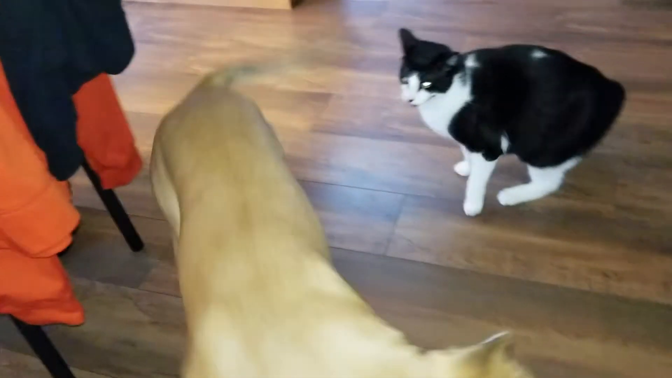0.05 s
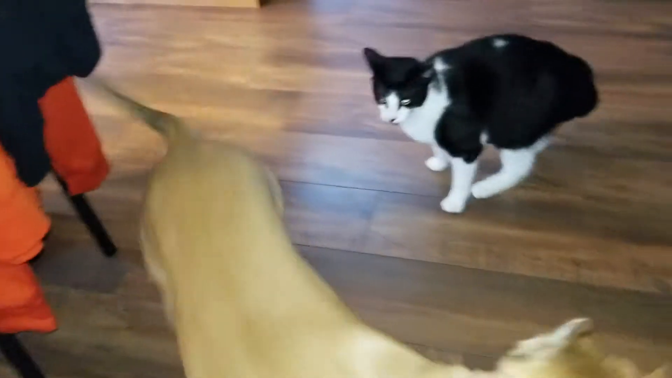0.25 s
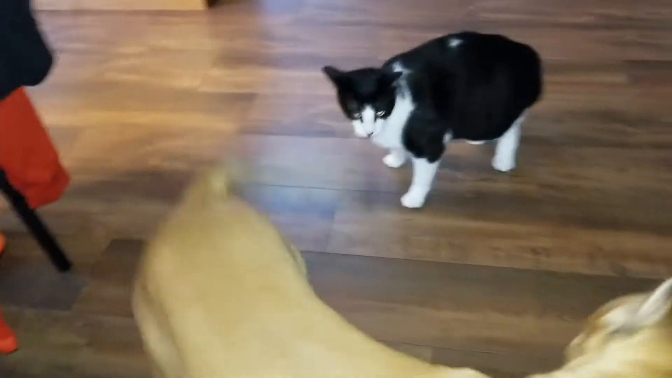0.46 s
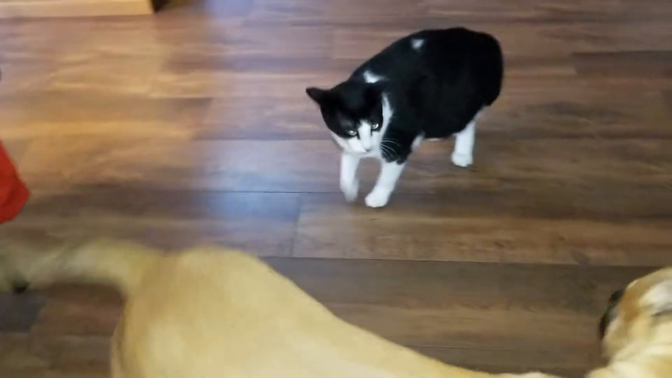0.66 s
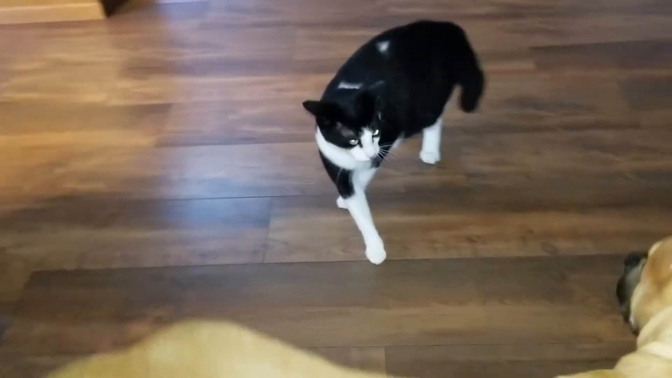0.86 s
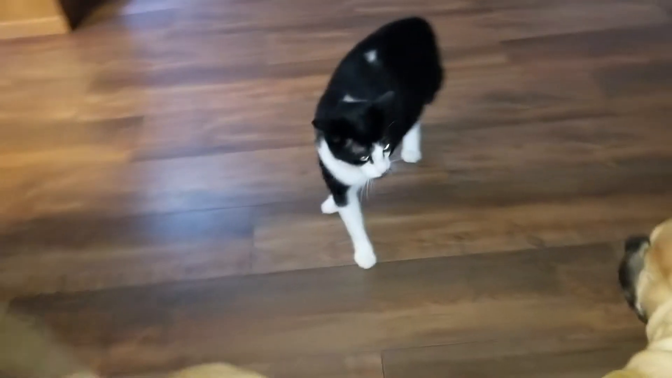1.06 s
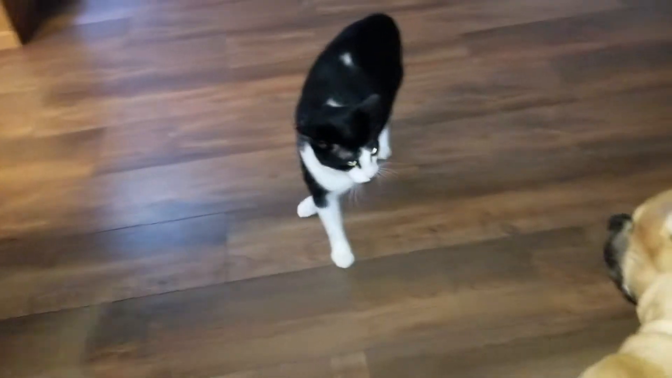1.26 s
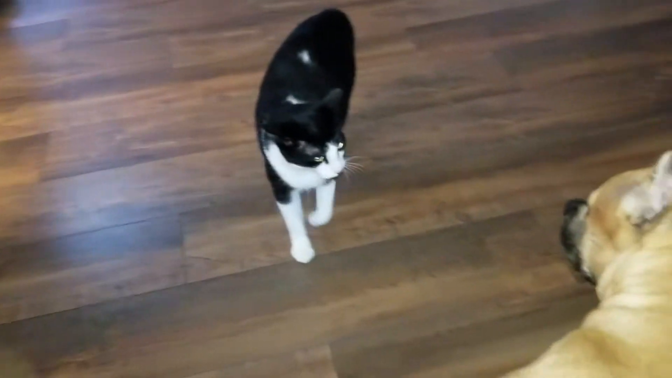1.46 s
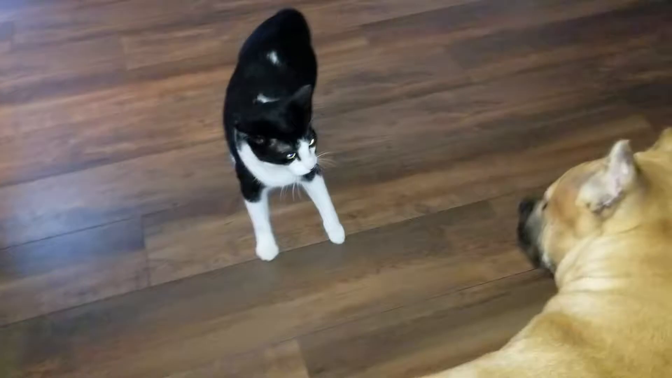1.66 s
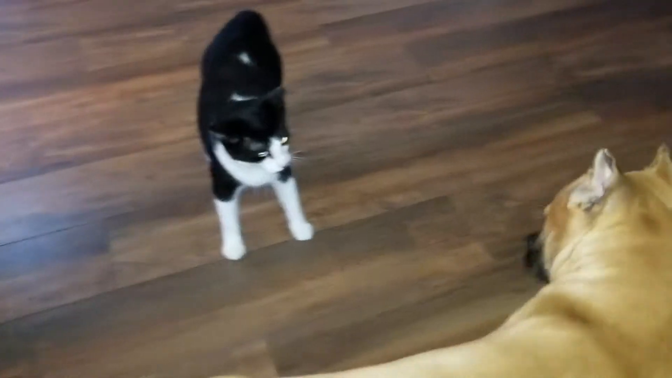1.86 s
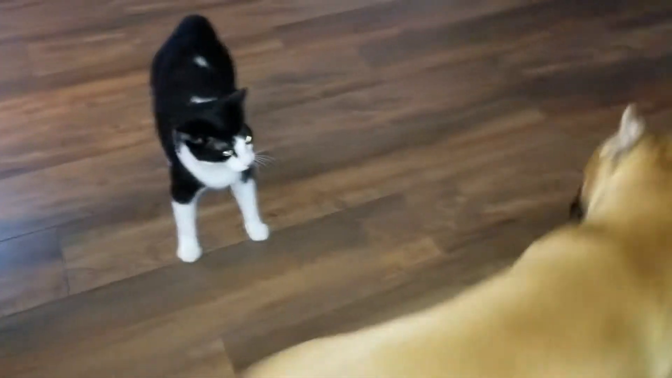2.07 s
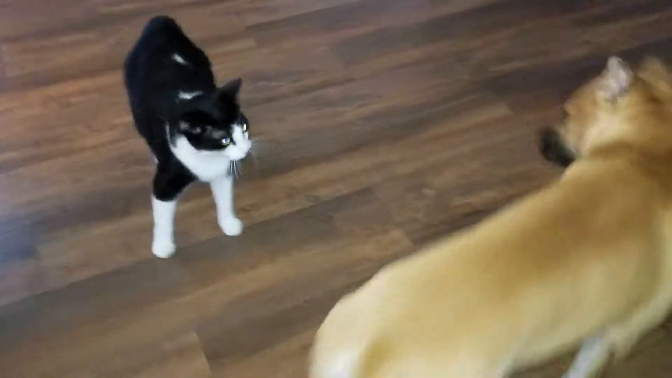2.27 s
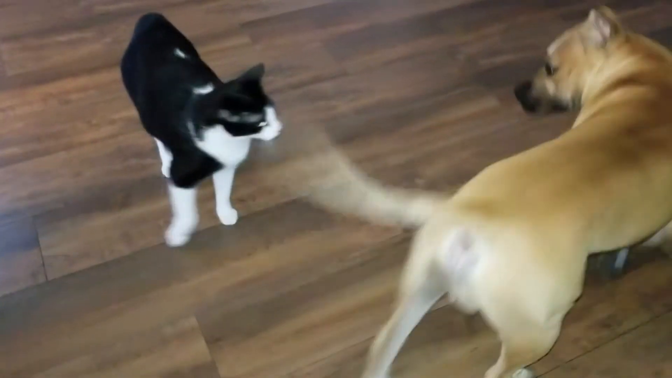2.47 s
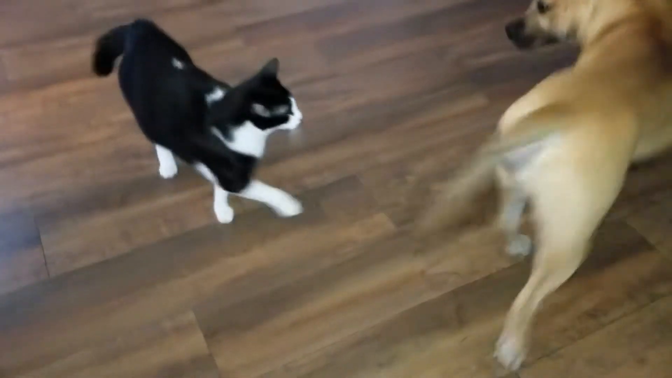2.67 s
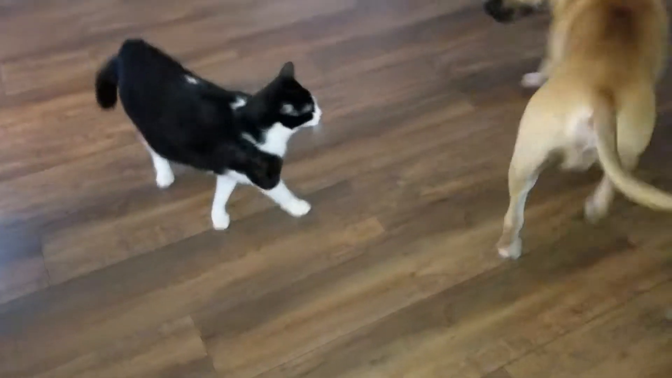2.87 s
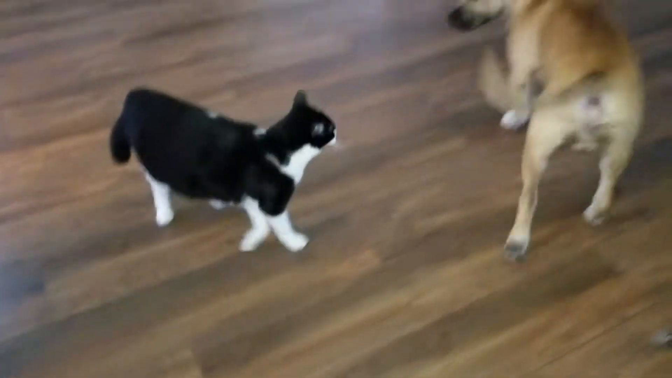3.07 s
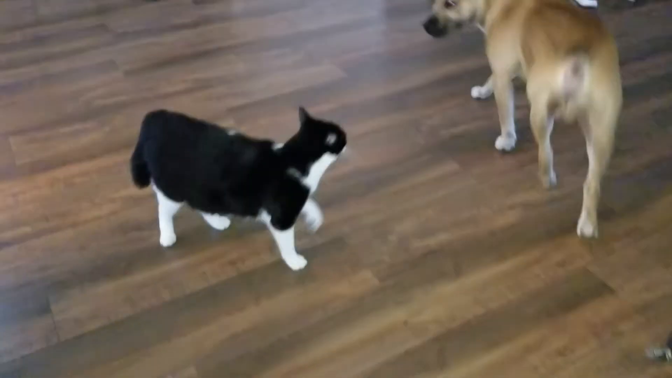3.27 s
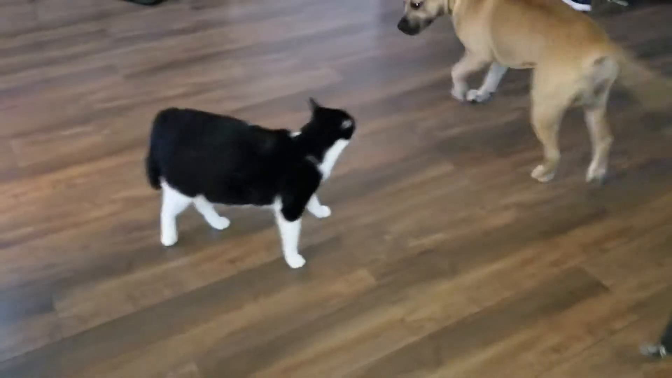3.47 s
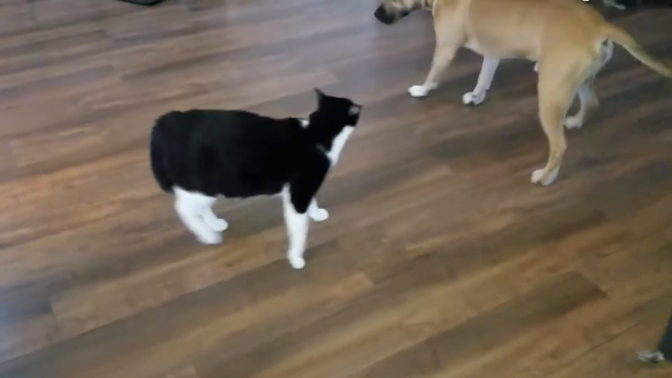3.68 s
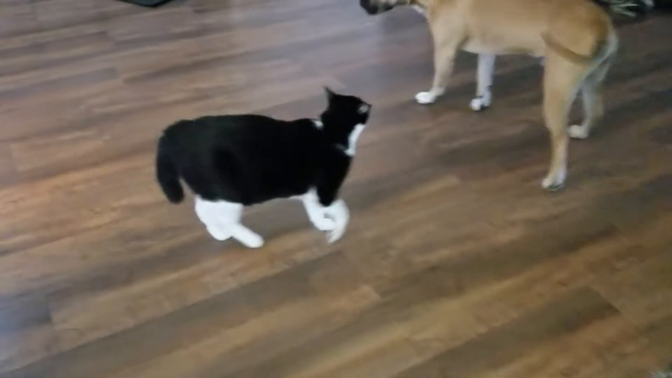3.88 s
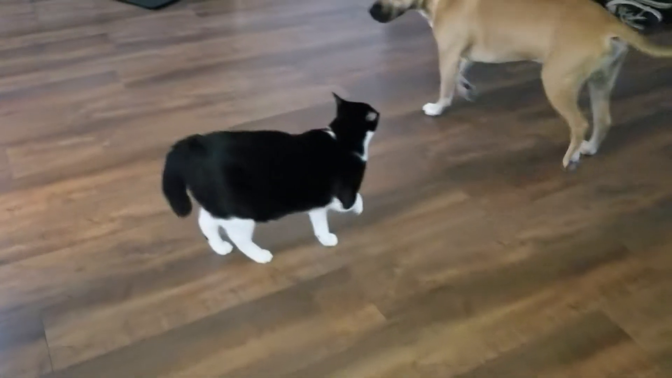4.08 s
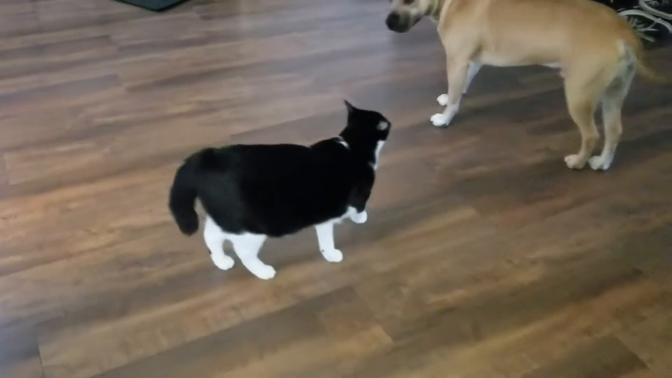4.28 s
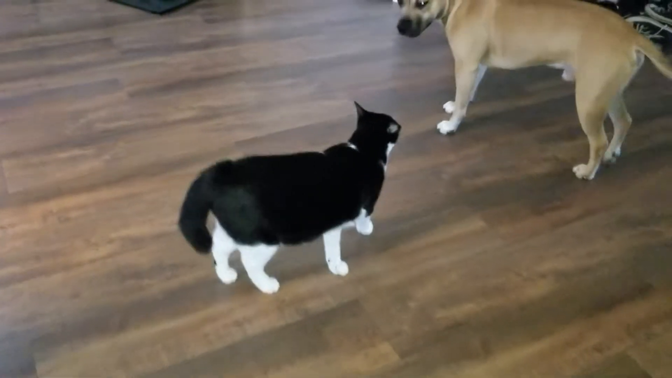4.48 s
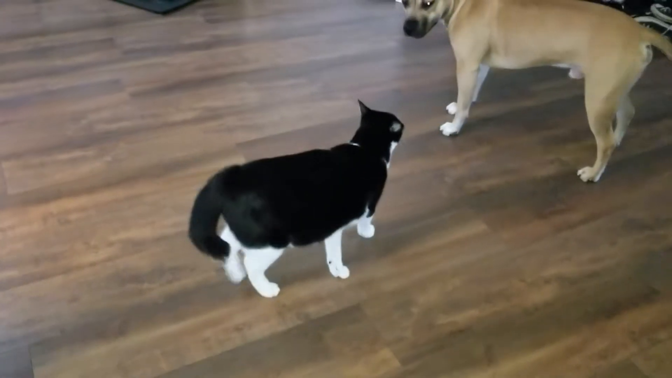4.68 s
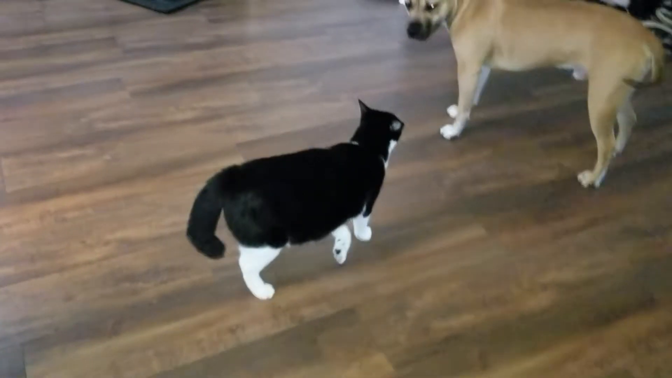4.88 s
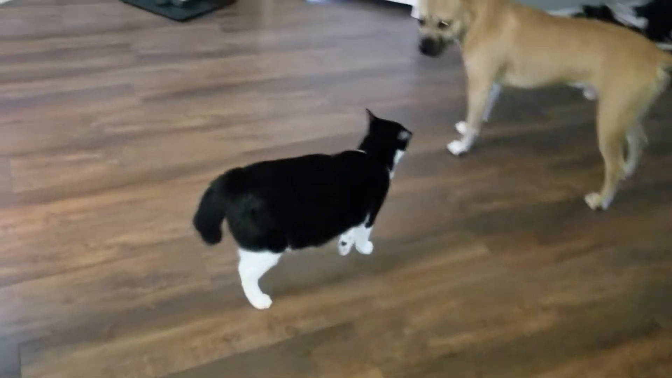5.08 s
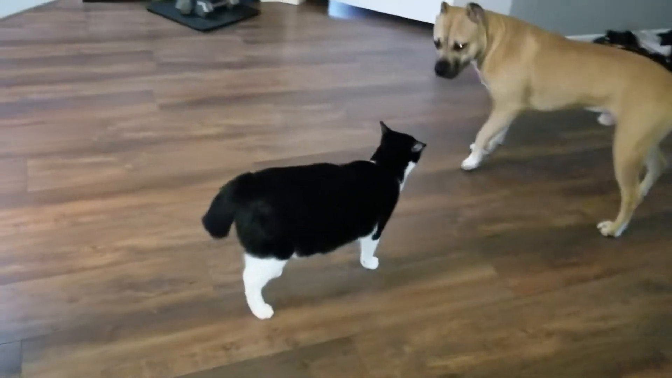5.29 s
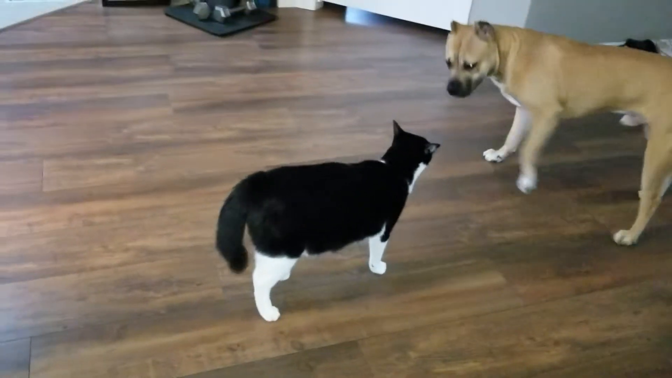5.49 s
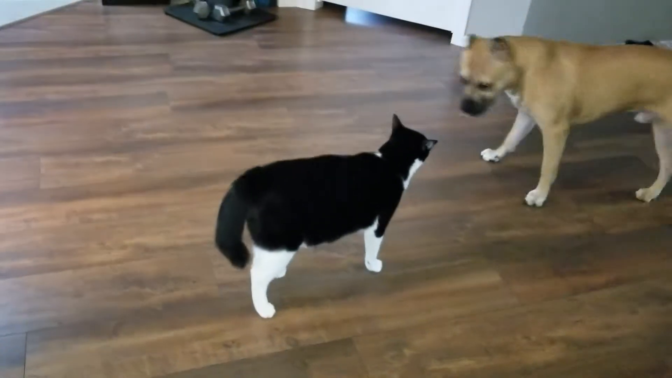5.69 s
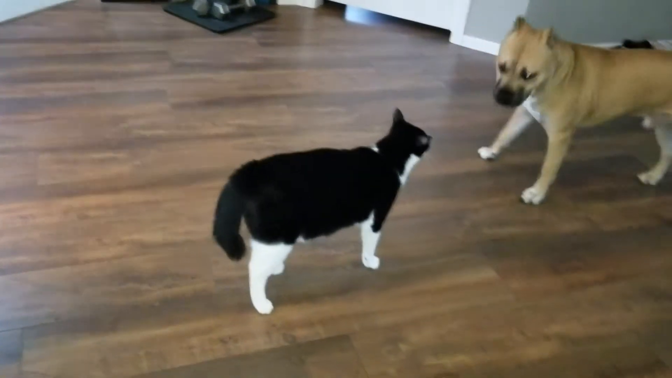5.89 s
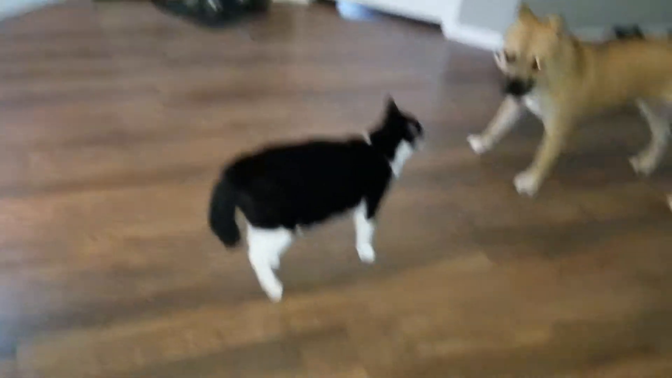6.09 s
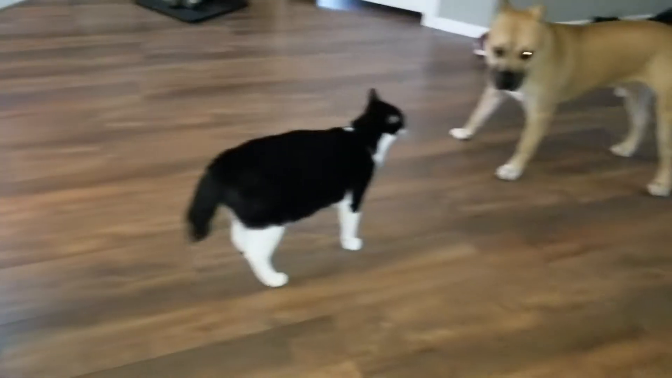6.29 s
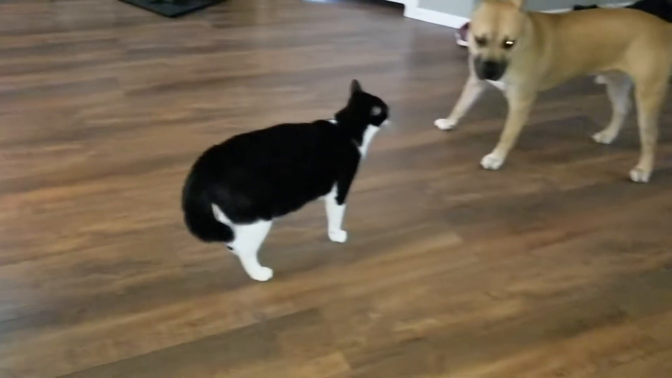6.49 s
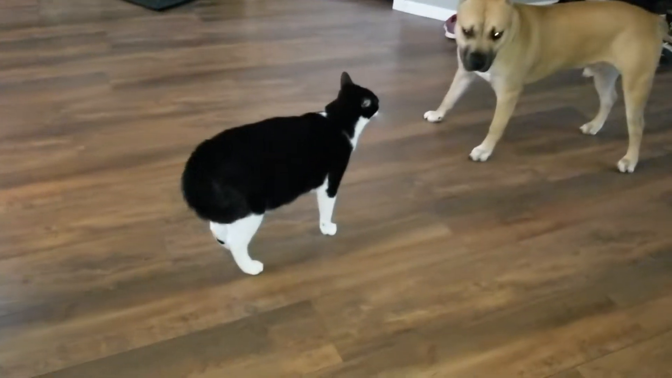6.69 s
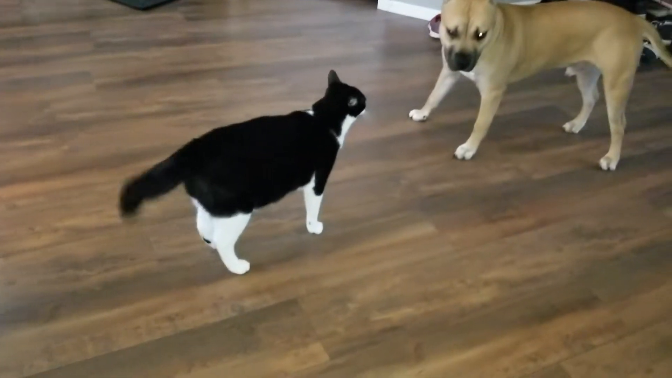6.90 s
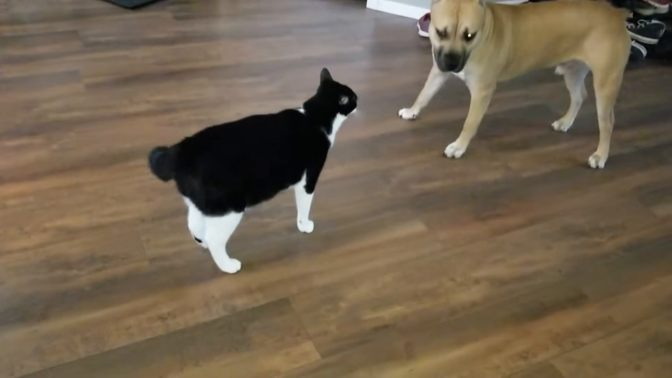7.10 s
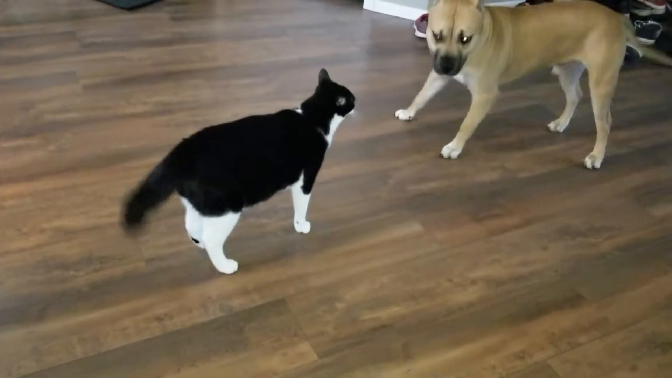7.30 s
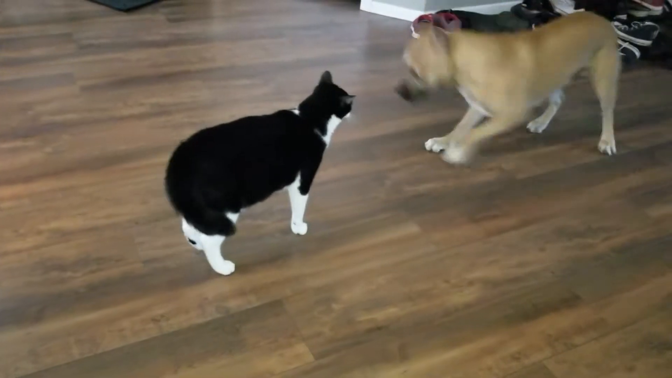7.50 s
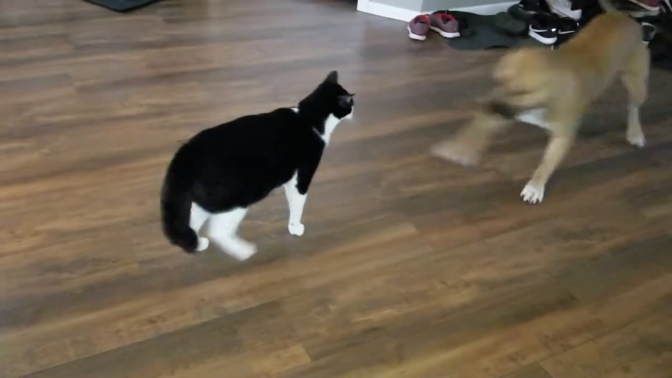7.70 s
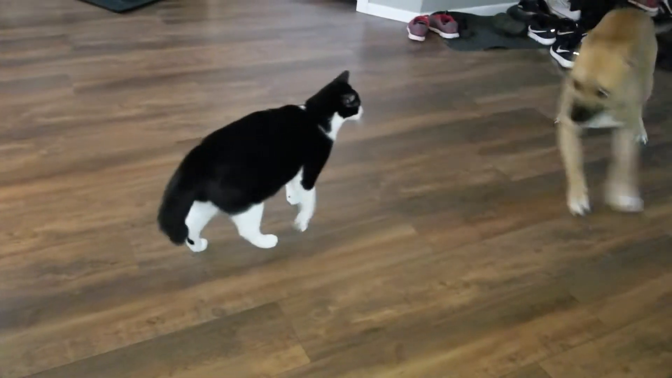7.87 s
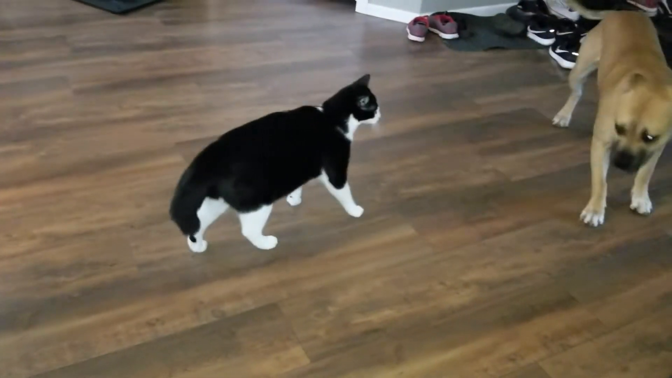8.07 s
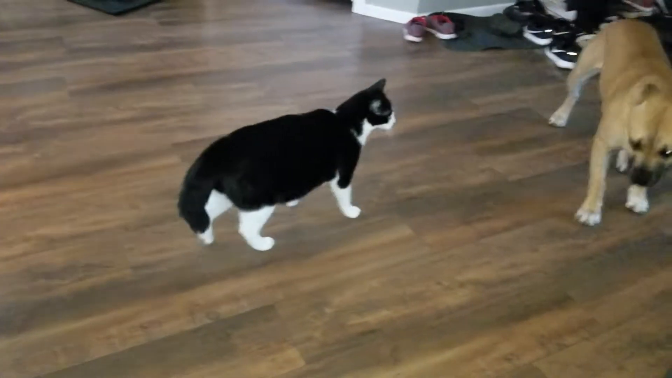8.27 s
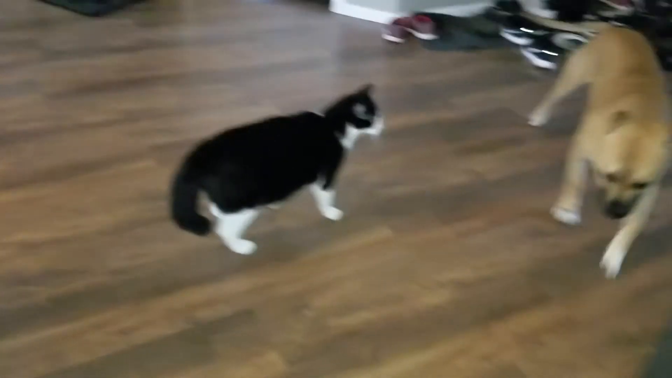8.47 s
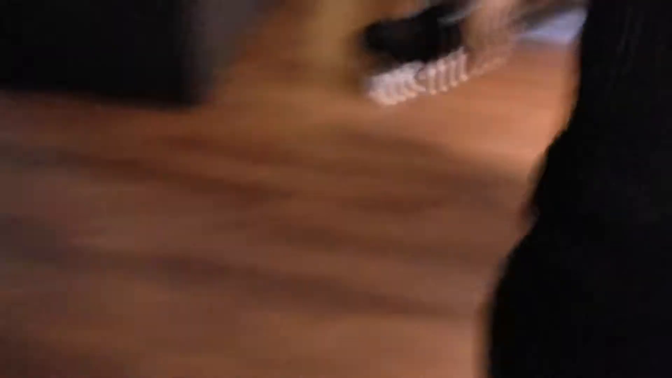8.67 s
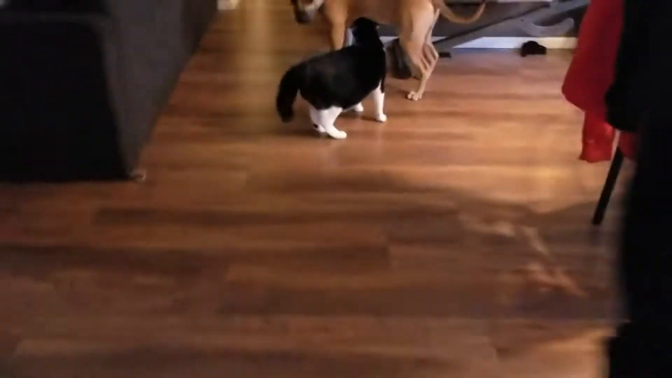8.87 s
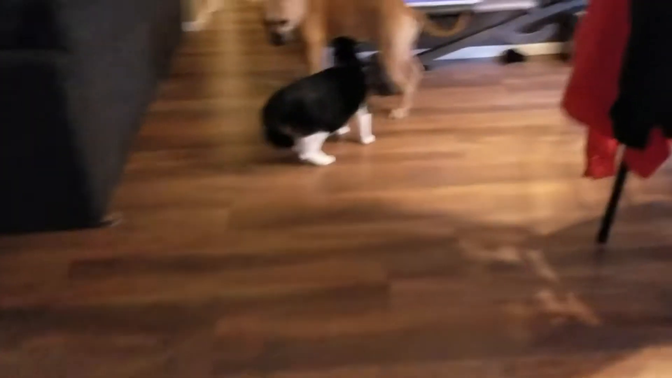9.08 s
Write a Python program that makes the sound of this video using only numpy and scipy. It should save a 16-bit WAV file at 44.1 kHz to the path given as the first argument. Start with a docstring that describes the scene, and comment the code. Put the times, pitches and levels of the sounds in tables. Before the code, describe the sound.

A dog steps around a cat on a laminate floor, its claws ticking in small irregular clusters with soft paw thumps and faint slides. A sharper group of clicks comes past the middle, then a short lull. A sudden lunge brings the loudest scrabbling and thudding before lighter ticks resume. The bare living room rings briefly after each click, a faint appliance hums, and the sound leans slightly left.

```python
"""A dog's claws tick and skid on hard laminate as it circles a cat in a bare living room.
Each contact rings nail and plank; a sudden lunge scrabbles loudly. Paws thump the boards, pads and
fur slide, a loose plank rings, hiss puffs softly. The room rings after every tick; an appliance hums.
Two spaced microphone ports hear it: the left louder, and a little later on the ticks."""
import sys
import numpy as np
from scipy import signal
from scipy.fft import rfft, irfft, next_fast_len
from scipy.io import wavfile
from scipy.ndimage import map_coordinates

SR = 44100
rng = np.random.default_rng(int(sys.argv[2]) if len(sys.argv) > 2 else 0)


def dump_mix(stems):
    """Bounce the given channels to the path in sys.argv[1] as a 16-bit WAV at rate SR."""
    frames = np.atleast_2d(stems).T  # one column per channel
    limited = np.clip(frames, -1, 1)  # hard clip at full scale
    pcm = np.round(limited * 32767).astype(np.int16)
    wavfile.write(sys.argv[1], SR, pcm)


N = 403074

# claw contacts (time [s], peak [dB], centre [Hz], treble [dB], length [ms])
CLAW_CONTACTS = [(0.067, -39, 5170, -15, 5.8), (0.087, -35.5, 2770, -22, 1.3),
                 (.257, -44.5, 4360, -37, 2.2), (0.35, -27, 4900, -4, 1.8), (0.408, -34, 2550, -8.5, 5.6),
                 (.562, -31.5, 3830, -18.5, 17), (0.5812, -37.5, 2850, -30, 4),
                 (1.762, -50, 4730, -27, 3.5), (1.788, -45, 3760, -38, 3.6), (1.861, -48, 4530, -28, 6.4),
                 (2.0171, -38.5, 7200, -15, 2.4), (2.0685, -33, 3200, -10, 5.2),
                 (2.121, -26, 3130, -17, 0.26), (2.156, -35, 4000, -25, 0.58), (2.199, -45, 6000, -7, .5),
                 (2.3748, -33, 6460, -12, 1.5), (2.3949, -30, 3200, -9.5, 2), (2.3997, -39, 4540, -18, 1.8),
                 (2.414, -30.5, 3430, -16, 1.5), (2.6537, -37, 2690, -20, 1.4),
                 (2.682, -31.5, 3330, -33.5, 12), (2.69, -20.5, 4940, -14, 0.22),
                 (2.711, -33.5, 4080, -14, 3.2), (2.845, -41, 5130, -1, 0.72), (2.983, -38, 4570, -13, 1.2),
                 (3.0212, -27.5, 4460, -18, 2.7), (3.0359, -22, 4600, -12.5, 0.65),
                 (3.281, -46, 4400, -15, 7.5), (3.314, -36.5, 4560, -14, 1.5),
                 (3.355, -28, 4680, -15.5, 1.05), (3.3655, -39, 4930, -3, 0.74),
                 (3.386, -30.5, 4640, -23, 1.1), (3.691, -33.5, 4460, -12.5, 3.2),
                 (3.898, -48, 4000, -21, .8), (3.9094, -43.5, 4220, -17, 1.2), (3.949, -33.5, 3900, -31, 9),
                 (4.023, -34, 4300, -36, 5.2), (4.22, -20, 4400, -15, 0.54), (4.2379, -31.5, 6760, -6, 2.5),
                 (4.4633, -35, 4180, -27, 13), (4.478, -35.5, 3560, -17, 4.6),
                 (4.718, -45.5, 3850, -40, 1.1), (4.857, -44.5, 6000, -13, 9.5),
                 (4.879, -38, 6100, -8, 8.8), (5.284, -48.5, 3500, -47.5, 13), (5.303, -41, 4350, -43, 4.7),
                 (5.4452, -45.5, 3860, -34, 13), (5.571, -17, 4660, -37, 0.7),
                 (5.5733, -15.5, 5430, -16.5, 0.61), (5.579, -15.5, 4580, -15.5, 1.6),
                 (5.685, -25.5, 3690, -11.5, 3.5), (5.8702, -37.5, 3900, -18.5, 2.1),
                 (5.8847, -28.5, 4530, -9, 1.26), (7.299, -48, 4200, -34.5, 2.4),
                 (7.313, -40.5, 4050, -51.5, 2.8), (7.321, -33, 4000, -14.5, 3.5),
                 (7.337, -31, 3860, -10, 4.3), (7.3546, -22.5, 4150, -18, 12),
                 (7.4243, -4.5, 5370, -11, 0.41), (7.43, -12.5, 4140, -22, 0.63),
                 (7.451, -10, 4130, -9, 1.4), (7.5957, -10, 4420, -12, 0.62),
                 (7.598, -5.5, 4440, -14.5, 1.25), (7.619, -15.5, 5340, -15, 1.1),
                 (7.8688, -13.5, 4380, -14, 2.8), (8.339, -41, 4300, -6.5, 2.4),
                 (8.3547, -29, 4450, -29, 1.4), (8.371, -34, 4180, -18.5, 1.1),
                 (8.408, -41, 4300, -17.5, 1.7), (8.441, -34.5, 4200, -19, 1.4),
                 (8.584, -30.5, 4970, -8.5, 1.54), (8.6126, -27, 5600, -44, 0.37),
                 (8.6431, -27.5, 4570, -13.5, 1.5), (8.657, -35, 4480, -40, 1.6),
                 (8.675, -32.5, 4200, -41, 2.1), (8.831, -42, 4100, -26, 3),
                 (8.9567, -36.5, 4600, -20, 0.4), (9.0513, -36.5, 4140, -21, 2.4),
                 (9.0729, -21, 4340, -18.5, 0.56), (9.0934, -41, 5700, -33, 0.88)]
# nail on laminate (frequency [Hz], density [dB])
NAIL_SPECTRUM = [(700, -42.5), (1500, -16), (2300, -2), (3300, -2), (5000, -6), (8000, -2.5), (9000, -24),
                 (11000, -57)]
# tick's treble (frequency [Hz], density [dB])
EDGE_SPECTRUM = [(6000, -58.5), (8500, -2), (10000, -1.5), (12500, 1), (16000, -15), (17000, -71)]
# plank under the claw (frequency [Hz], density [dB])
PLANK_SPECTRUM = [(500, -17), (830, -14.5), (1400, -13.5), (2200, -22.5)]
# weight behind the claws (time [s], plank knock over tick [dB])
CLAW_WEIGHT = [(.3, -8), (.6, -49), (1.8, -6), (2.1, -11), (2.4, -14), (2.67, -8), (3.05, -21), (3.33, -20),
               (3.9, -21.5), (4.9, -14), (5.58, -13), (5.7, -14), (7.4, -12), (7.6, -13), (8.4, -21.5),
               (8.65, -20.5), (9.1, -59)]
# paw landings (time [s], level [dB], boom [Hz])
PAW_LANDINGS = [(0.069, -45.5, 66.6), (0.3137, -39, 170), (.345, -40, 130), (0.762, -44.5, 176),
                (1.958, -42.5, 88), (2.28, -49, 80.5), (2.657, -35, 100), (2.686, -36, 237),
                (3.289, -43, 144), (3.317, -39, 74.5), (4.229, -49, 63.5), (5.742, -36, 144),
                (5.765, -43.5, 75), (6.658, -44, 140), (6.675, -54, 80.4), (6.698, -46.5, 203),
                (7.41, -37, 58.4), (7.447, -30.5, 124), (7.457, -24, 105), (7.606, -30, 209),
                (7.62, -36.5, 70.3), (7.628, -26.5, 112), (7.89, -33, 190), (8.401, -47, 63)]
# floor knock (frequency [Hz], density [dB])
BOARD_SPECTRUM = [(30, -38), (55, 3.5), (250, -2), (500, -14), (1200, -42.5)]
# claw on a hollow spot (time [s], level [dB], ring [Hz])
HOLLOW_HITS = [(4.22, -73, 884), (5.578, -51, 786)]
# pad and fur slides, one envelope each (time [s], level [dB])
SLIDE_STROKES = [
    [(1.44, -102), (1.75, -70.5), (2.05, -86), (2.2, -97), (2.28, -69), (2.53, -75.5), (2.56, -100)],
    [(3.27, -59), (3.3, -73), (3.4, -101)],
    [(4.87, -85), (4.92, -67.5), (4.98, -97)],
    [(7.29, -69), (7.38, -54.5)],
]
# sliding friction (frequency [Hz], density [dB])
RUB_SPECTRUM = [(240, -35), (400, -9), (1130, -7), (2000, -5.5), (6490, -9.5), (16000, -25.5)]
# puffs of hiss (mid time [s], level [dB], length [s], centre [Hz])
HISS_PUFFS = [(2.223, -56, 0.061, 12560), (2.312, -58, 0.13, 12860), (2.514, -51, 0.069, 12930),
              (7.009, -77.5, 0.48, 4660)]
# puff colour (frequency / centre [ratio], density [dB])
PUFF_SPECTRUM = [(.24, -12), (.6, -2.5), (.8, -12), (1.0, 5.5), (1.12, -9.5), (1.35, -40.5)]
# appliance tones (frequency [Hz], level [dB], waver depth [Hz])
HUM_TONES = [(53.3, -61, 1.5), (119, -77.5, 2), (207.6, -72.5, 3.56), (245.6, -72.5, 4.23)]
# room tone and self-noise (frequency [Hz], density [dB])
AIR_SPECTRUM = [(44, -46.5), (75, -4), (115, -5), (184, -11.5), (246, -7), (276, -9.5), (404, -10),
                (632, -29), (885, -25), (1450, -31.5), (6670, -34.5), (12200, -38), (16000, -36.5)]
# room decay (frequency [Hz], T60 before the added fade [s])
ROOM_T60 = [(100, 1), (300, 0.53), (800, 1), (2000, 0.7), (5000, 0.69), (9000, 0.54), (14000, 0.54)]
# left-right likeness (frequency [Hz], correlation [-1..1])
PORT_COHERENCE = [(60, 0.96), (180, 0.65), (550, 0.51), (1650, 0.0088), (4970, -0.036), (15000, -0.0071)]
# full shading (frequency [Hz], left boost and right cut [dB])
PORT_SHADING = [(60, 0.8), (500, 6), (3000, 12), (6000, 14), (8500, 4), (12500, 7)]
# dog's offset to the left (time [s], share of full shading [0..1])
DOG_SIDE = [(0.0, 0.1), (2.04, 0.25), (9.14, 0.16)]


def claws():
    """Each contact rings the nail; the room answers lower, weaker for loud or long contacts."""
    out, lead_samples, left_lag_samples = np.zeros((2, N)), 600, 10
    for time_s, peak_db, centre_hz, treble_db, length_ms in CLAW_CONTACTS:
        knock_db = np.interp(time_s, *np.transpose(CLAW_WEIGHT))
        scrape_s = np.clip(length_ms * 0.0014 - 0.0004, 0.0001, 0.012)
        direct = claw_colour(centre_hz, treble_db, knock_db, width_hz=740, skirt=0.27, dull_db=3.5)
        burst = filtered(claw_scrape(scrape_s, lead_samples), direct)
        burst *= amp(peak_db) / np.max(np.abs(signal.hilbert(burst)))
        diffuse = claw_colour(0.91 * centre_hz, treble_db, knock_db, width_hz=900, skirt=0.55, dull_db=0.3)
        tail = claw_tail(scrape_s, lead_samples, diffuse)
        wet_db = 2.5 - 0.0616 * (peak_db + 30) - 0.26 * np.log2(length_ms / 1.2)
        sound = amp(wet_db) * np.linalg.norm(burst[0]) / np.linalg.norm(tail[0]) * tail
        sound[0, left_lag_samples:][:burst.shape[1]] += burst[0]
        sound[1, :burst.shape[1]] += burst[1]
        add(out, sound, time_s - lead_samples / SR)
    return out


def claw_scrape(scrape_s, lead_samples, n=4000):
    """Stereo friction burst; a long skid swells slowly, catches and slips."""
    skid = min(scrape_s / 0.0057, 1)  # 0 tick, 1 skid
    age = np.clip(1 + (np.arange(n) - lead_samples) / SR / scrape_s, 0, None)
    envelope = (age * np.exp(-age ** 1.275 / 1.2)) ** (1 + skid)
    slips_db = 4.5 * skid * np.repeat(rng.standard_normal(n // 40), 40)
    noise = [[1, 0.96], [1, -0.48]] @ rng.standard_normal((2, n))
    return envelope * amp(slips_db) * noise


def claw_colour(peak_hz, treble_db, knock_db, width_hz, skirt, dull_db):
    """Response of nail resonance, treble edge and plank; brighter ticks tilt up above the peak."""
    def nail(hz):
        tilt_db = 0.36 * (treble_db + 20) * np.clip(np.log2((hz + 1) / peak_hz), 0, 1)
        resonance = skirt + 1 / (1 + ((hz - peak_hz) / width_hz) ** 2)
        return amp(along(NAIL_SPECTRUM, hz) + tilt_db) * resonance

    parts = [(0, nail), (treble_db - dull_db, gain(EDGE_SPECTRUM)), (knock_db, gain(PLANK_SPECTRUM))]
    grid_hz = np.arange(1, SR / 2, 50)
    return lambda hz: sum(amp(db) * shape(hz) / np.linalg.norm(shape(grid_hz)) for db, shape in parts)


def claw_tail(scrape_s, lead_samples, colour):
    """Room's answer to a tick; each floor spot favours its own narrow resonances."""
    ripple_db = 3 * np.clip(rng.standard_normal(200), -2, 1.6)
    ripple_hz = 110 * np.arange(200)
    tail = np.pad(reverb(rise_s=0.002 + scrape_s), ((0, 0), (lead_samples, 0)))
    return filtered(tail, lambda hz: colour(hz) * amp(np.interp(hz, ripple_hz, ripple_db)))


def paws():
    """A paw's weight drives the boards: a knock, and a boom down 60 dB in 12 cycles."""
    out, t = np.zeros((2, N)), np.arange(SR // 4) / SR
    attack_s, knock_t60_s = 0.0018, 0.38
    for time_s, level_db, boom_hz in PAW_LANDINGS:
        boom = np.sin(2 * np.pi * boom_hz * t) * amp(-60 * t * boom_hz / 12)
        knock = 0.34 * coloured(len(t), BOARD_SPECTRUM) * amp(-60 * t / knock_t60_s)
        thump = amp(level_db) * (boom + knock) * (1 - np.exp(-t / attack_s))
        add(out, in_room(thump, wet_db=-7), time_s)
    return out


def loose_plank(t60_s=0.3):
    """A struck loose plank rings on one note."""
    out, t = np.zeros((2, N)), np.arange(SR // 3) / SR
    for time_s, level_db, ring_hz in HOLLOW_HITS:
        ring = amp(level_db - 60 * t / t60_s) * np.sin(2 * np.pi * ring_hz * t)
        add(out, in_room(ring, wet_db=-14), time_s)
    return out


def sliding():
    """Gritty friction of pads and fur on the boards."""
    out = np.zeros((2, N))
    for stroke in SLIDE_STROKES:
        times_s, levels_db = np.transpose(stroke)
        t = np.arange(times_s[0], times_s[-1], 1 / SR)
        grit_db = 4 * wobble(rate_hz=120)[:len(t)]
        rub = unit(amp(grit_db) * coloured(len(t), RUB_SPECTRUM))
        add(out, in_room(amp(np.interp(t, times_s, levels_db)) * rub, wet_db=6.7), times_s[0])
    return out


def puffs():
    """Soft swells of hiss near the left port."""
    out = np.zeros((2, N))
    for mid_s, level_db, length_s, centre_hz in HISS_PUFFS:
        n = round(length_s * SR)
        hiss = coloured(n, np.multiply(PUFF_SPECTRUM, [centre_hz, 1]))
        add(out, in_room(amp(level_db) * np.hanning(n) * hiss, wet_db=-11), mid_s - length_s / 2)
    return out * amp([[6], [-6]])


def appliance_hum():
    """Low tones wavering in pitch and level."""
    hum = np.zeros(N)
    for hz, level_db, waver_hz in HUM_TONES:
        envelope = np.sqrt(2) * amp(level_db + 0.42 * wobble(rate_hz=21))
        pitch_hz = hz + waver_hz * wobble(rate_hz=20)
        hum += envelope * np.sin(2 * np.pi * np.cumsum(pitch_hz) / SR)
    return hum


def room_tone():
    """Steady air and a low rumble."""
    air = unit(paired(rng.standard_normal((2, N)), gain(AIR_SPECTRUM)))
    rumble = coloured(N, [(30, -38), (42, 6), (52, 2), (75, -1.5), (110, -58.5)])
    return amp(-63.5) * air + amp(-66) * rumble


def reverb(rise_s, added_fade_db_per_s2=65.5):
    """Room tail, each band at its own rate; an added fade, like a noise suppressor, cuts it short."""
    hz, t, bands = signal.stft(rng.standard_normal((2, SR * 3 // 5)), SR, nperseg=256)
    room_db = -60 * t / along(ROOM_T60, hz)[:, None]
    tail = signal.istft(bands * amp(room_db - added_fade_db_per_s2 * t * t), SR, nperseg=256)[1]
    onset = 1 - np.exp(-np.arange(tail.shape[1]) / SR / rise_s)
    tail = paired(tail * onset, np.ones_like)
    return tail / np.linalg.norm(tail[0])


def in_room(x, wet_db):
    """Direct sound plus room tail at both ports."""
    impulse = amp(wet_db) * reverb(rise_s=0.013)
    impulse[:, 0] += 1
    return signal.fftconvolve(x[None], impulse, axes=1)


def paired(noises, colour):
    """Two independent noises become a left and right that agree in the bass."""
    def mid_side(hz):
        angle = np.arccos(np.clip(along(PORT_COHERENCE, hz), -1, 1)) / 2
        return colour(hz) * [np.cos(angle), np.sin(angle)]

    mid, side = filtered(noises, mid_side)
    return np.array([mid + side, mid - side])


def port_shading(x):
    """The ports shade each other, most in the claw band, following the dog's side."""
    shaded = filtered(x, lambda hz: amp(along(PORT_SHADING, hz) * [[1], [-1]]))
    share = np.interp(np.arange(N) / SR, *np.transpose(DOG_SIDE))
    return x + share * (shaded - x)


def amp(db):
    return 10 ** (np.asarray(db) / 20)


def unit(x):
    return x / np.sqrt(np.mean(x ** 2) + 1e-20)


def along(points, hz):
    """Interpolate on a log frequency axis."""
    knots_hz, values = np.transpose(points)
    return np.interp(np.log(hz + 1), np.log(knots_hz + 1), values)


def gain(spectrum):
    return lambda hz: amp(along(spectrum, hz))


def filtered(x, response):
    n = x.shape[-1]
    n_fft = next_fast_len(n + 4096)
    return irfft(rfft(x, n_fft) * response(np.fft.rfftfreq(n_fft, 1 / SR)), n_fft)[..., :n]


def coloured(n, spectrum):
    return unit(filtered(rng.standard_normal(n), gain(spectrum)))


def wobble(rate_hz):
    """Smooth random curve."""
    knots = rng.standard_normal(int(N * rate_hz / SR) + 4)
    return map_coordinates(knots, [np.arange(N) * rate_hz / SR])


def add(out, x, start_s):
    span = out[:, round(start_s * SR):][:, :x.shape[1]]
    span += x[:, :span.shape[1]]


def scene():
    """Dog and puffs over a background that leans slightly left."""
    dog = port_shading(claws() + paws() + sliding() + loose_plank())
    return dog + puffs() + (room_tone() + appliance_hum()) * amp([[0.6], [-0.6]])


def record(dry):
    """Brick-wall low-pass at 16 kHz."""
    return filtered(dry, lambda hz: hz < 16000)


dry = scene()
out = record(dry)
dump_mix(out)
```